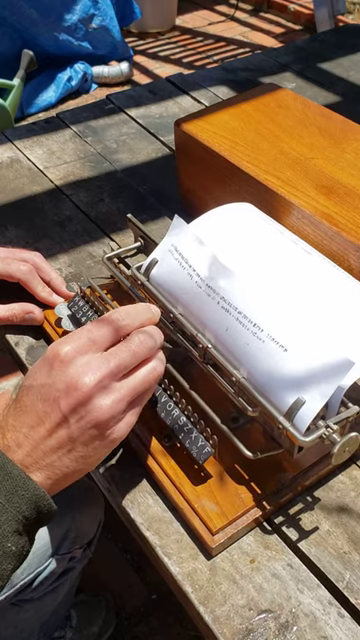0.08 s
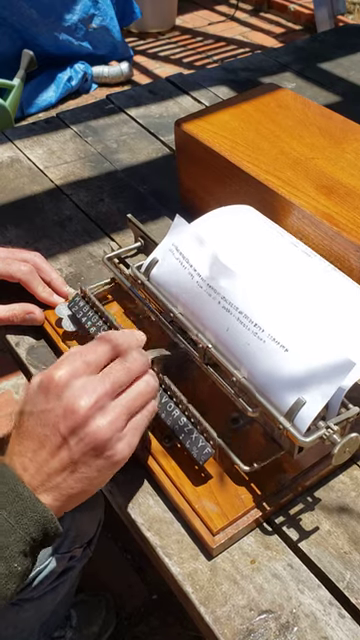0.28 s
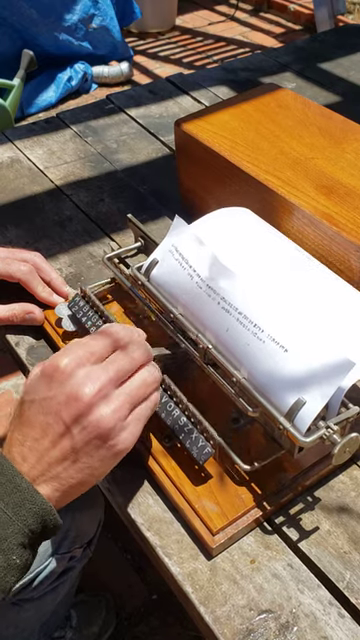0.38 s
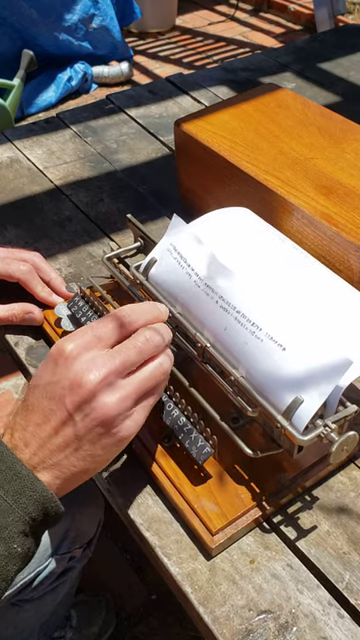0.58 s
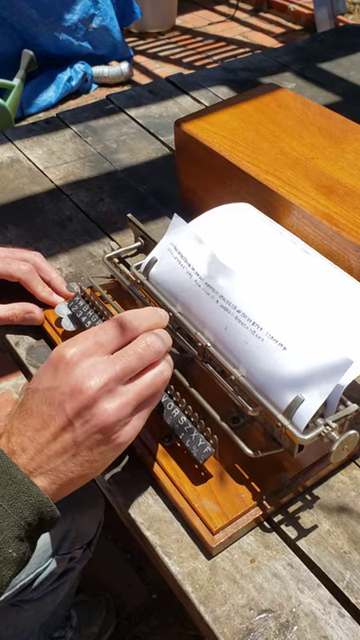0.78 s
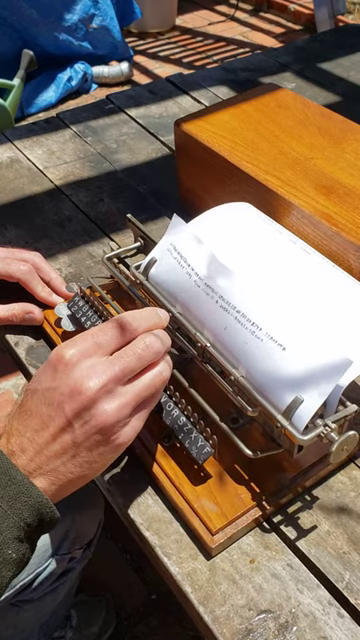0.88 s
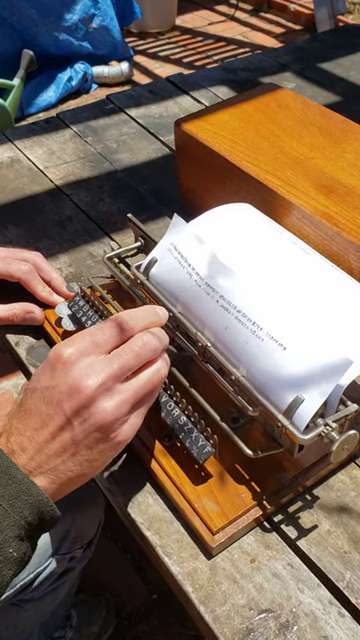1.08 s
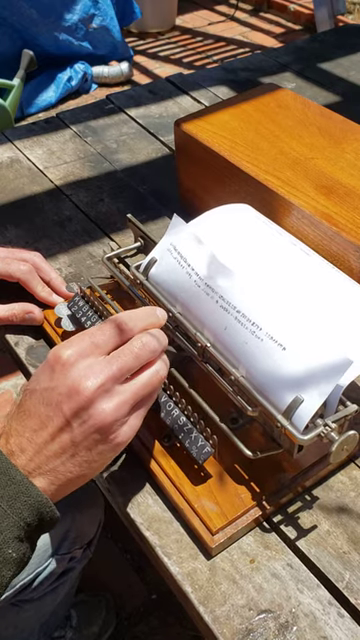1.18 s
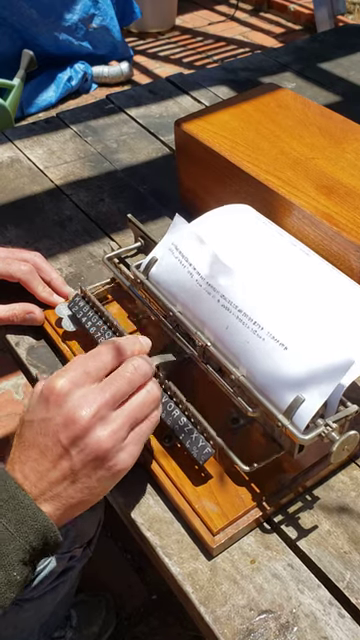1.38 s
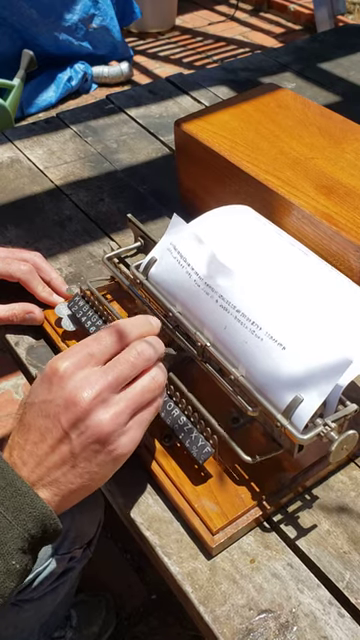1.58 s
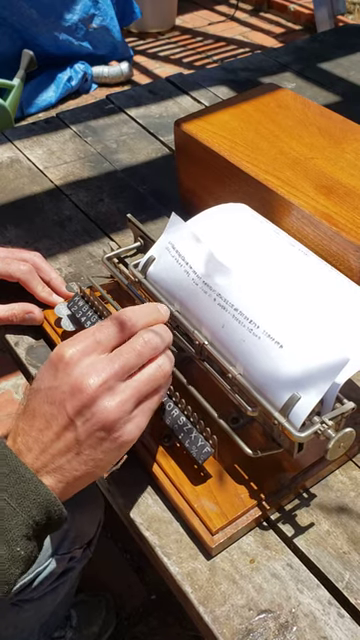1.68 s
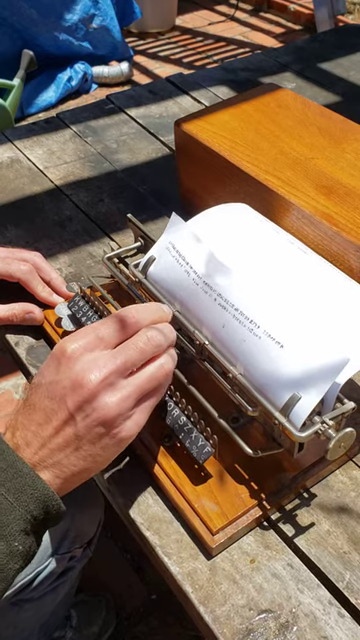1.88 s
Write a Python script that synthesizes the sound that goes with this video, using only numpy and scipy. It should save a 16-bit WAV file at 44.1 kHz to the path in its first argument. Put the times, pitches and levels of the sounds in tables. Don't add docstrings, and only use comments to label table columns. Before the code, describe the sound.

An old index typewriter prints two letters outdoors with metallic clacks and sharp, ringing snaps.

```python
import sys
import numpy as np
from scipy import signal
from scipy.fft import rfft, irfft
from scipy.io import wavfile
from scipy.ndimage import uniform_filter1d

SR = 44100
rng = np.random.default_rng(int(sys.argv[2]) if len(sys.argv) > 2 else 0)


def volts_from_decibels(level):
    exponent = np.asarray(level, float) / 20
    return 10 ** exponent


def generate_wav(sig):
    pcm = np.round(np.clip(np.atleast_2d(sig).T, -1, 1) * 32767).astype(np.int16)
    wavfile.write(sys.argv[1], SR, pcm)


N = 83790

# pitch_hz, level_db (per Hz)
TRAFFIC = [(12, -62.5), (20, -37), (42, -12.5), (65, -3.5), (167, -13.5), (206, -18), (394, -25),
           (1200, -40.5), (1560, -79.5), (2640, -120)]
HISS = [(710, -31), (1200, -2.5), (3590, -9), (4050, -14), (6020, -8.5), (8450, -22), (14900, -16.5),
        (16500, -30)]
TRAFFIC_DB, HISS_DB = -49.5, -74.5
# pitch_hz, likeness (0-1)
AIR_SAME = [(60, 0.9), (240, 0.9), (950, 0.31), (3770, 0.16), (15000, 0.03)]
# pitch_hz, left_minus_right_db
AIR_PAN = [(60, 2.5), (240, 3.5), (950, 2.7), (3770, 3.9), (15000, 4.5)]
DRONE_HZ, DRONE_WIDTH_HZ, DRONE_DB = 62, 9, -51

# start_s, length_s, level_db
SLIDES = [
    (0.127, 0.25, -69.5),
    (1.258, 0.094, -65),
]
# pitch_hz, level_db
RUB = [(600, 12.5), (2500, 4), (6500, -7), (9000, -8), (15000, -8), (16300, -11)]
# start_s, peak_db, links_db, chatter_s
TICKS = [
    (0.0976, -47.5, -21, 0.0019),
    (0.779, -49.5, -40, 0.0015),
    (1.26, -44.5, -13.5, 0.00097),
    (1.716, -54, -15, 0.0017),
]
# pitch_hz, level_db
POINTER = [(1500, 4), (3000, 6.5), (5000, -2), (6400, 13.5), (8000, -2.5), (10000, 0)]

# start_s, peak_db, links_db, wood_db, chatter_s
CONTACTS = [
    (0.2179, -27, -18.5, -18, 0.0046),
    (0.2282, -39, -14, -7, 0.0014),
    (0.2371, -20, -6.5, -15, 0.0031),
    (0.2717, -20, -8.5, -11.5, 0.0029),
    (0.2767, -33.5, -0.5, -5, 0.0021),
    (0.2854, -38.5, -15, -8, 0.0017),
    (0.4816, -35, -25.5, -25.5, 0.0018),
            (1.3049, -53.5, -15, -4, 0.0073), (1.321, -53.5, -32, -21, 0.003),
          (1.3541, -49, -42, 5.5, 0.0038), (1.363, -27.5, -31, -10, 0.0035),
          (1.3647, -21, -6, -17.5, 0.0037), (1.4004, -55.5, -1, -17, 0.0018),
          (1.4063, -25, -12, -14, 0.0037), (1.4114, -42, 7.5, -1, 0.0023), (1.416, -38.5, -17, 0, 0.0035),
          (1.667, -48.5, -14, -14.5, 0.003), (1.8924, -62.5, -26.5, -4, 0.0027)]
# start_s, peak_db, links_db, wood_db, chatter_s
STRIKES = [
    (0.2693, -19, -27, -13.5, 0.0004),
    (1.404, -18.5, -24, -19.5, 0.0004),
]
# start_s, peak_db, links_db, wood_db, chatter_s
LIFTS = [(0.4061, -37.5, -7.5, -2.5, 0.0037), (0.4122, -31, -12, -14, 0.001),
         (0.4138, -33.5, -23.5, -18.5, 0.0014), (0.4201, -29.5, -24.5, -9, 0.0016),
         (0.4235, -43.5, -4.5, -10, 0.002), (0.4273, -40, -2, -3.5, 0.003),
         (1.5334, -43, -3.5, -7.5, 0.0034), (1.5396, -33, -21, -10.5, 0.002),
         (1.5454, -46, -30, -19, 0.0025), (1.5543, -39.5, -3.5, -11, 0.0023),
         (1.5543, -40, -26, -10, 0.0043), (1.575, -44.5, -11, -4, 0.003)]
# start_s, peak_db, links_db, rebound_s, rebound_db
SNAPS = [
    (0.4596, -11, -1.5, .0014, 3),
    (1.5973, -13, -0.5, .0013, 0.9),
]
# start_s, peak_db, pitch_hz
THUMPS = [(0.269, -32.5, 187), (0.278, -25, 108), (0.285, -36, 580), (.295, -26.5, 315),
          (0.311, -25.5, 600), (0.32, -32, 504), (1.407, -30.5, 207), (1.412, -28, 100),
          (1.427, -30.5, 150), (1.418, -34, 275), (1.306, -36, 306), (1.446, -29, 610), (1.556, -32, 670)]
# start_s, pitch_hz, level_db, t60_s
SINES = [(0, 3520, -101.5, 2.5), (.46, 5994, -59.5, 1.19), (.46, 6070, -53.5, 0.64), (.46, 5840, -64, 1.1),
         (.46, 3488, -77, 2.5), (1.41, 3490, -65.5, 8.2), (1.598, 5965, -76, 0.58),
         (1.598, 6000, -64.5, 0.88), (.462, 2638, -45, 0.15), (.462, 2756, -41.5, .17),
         (.462, 4194, -50.5, .17), (1.6, 2920, -38.5, 0.13), (1.6, 2110, -51.5, .24),
         (1.6, 4974, -49.5, 0.12), (.461, 6010, -40, .2), (.462, 7400, -50.5, .12), (.462, 4064, -49.5, .11),
         (1.6, 6848, -47, 0.15), (1.6, 2762, -52, 0.14)]

# pitch_hz, level_db
FRAME = [(1500, -28.5), (2100, -10.5), (2800, 3), (3400, -4), (4200, -7), (5300, -8.5), (7000, -9.5),
         (9500, -23.5)]
PLATEN = [(700, -10), (900, -2), (1890, -6), (3120, 3.5), (3760, -8), (4700, -8.5), (5700, -10),
          (9000, -23.5)]
LINKS = [(7500, -13.5), (9500, -13), (11500, 2), (13500, -0.5), (15750, 1), (16400, -9)]
WOOD = [(200, -8), (320, -9), (650, -3.5), (1100, 0.5), (1700, -4.5), (2200, -8)]
FRAME_T60_S, LINKS_T60_S, WOOD_T60_S = 0.008, 0.0089, 0.087
# pitch_hz, level_db, t60_s
WOOD_MODES = [(215, -5.5, 0.095), (315, -6, 0.083), (400, -10, .05), (504, -5.5, .06), (663, -5, .06),
              (830, -3, .04), (994, -4.5, 0.023), (1092, -4.5, 0.062), (1257, -3.5, .05), (1500, -8, 0.06),
              (1738, -4, .06), (2013, -5.5, .04), (1990, -8, .04)]
PAWL = [(1200, -31, .012), (1840, -16.5, 0.008), (2480, -6.5, 0.006), (2680, -3.5, 0.006), (2980, 0, 0.006),
        (3166, -7.5, .006), (3460, -14, 0.0087), (3976, 1.5, .011), (4200, -1.5, 0.0095),
        (4890, -6.5, 0.023), (6180, -8.5, 0.0078), (7630, 2, .007), (8700, -17, 0.0048)]
REBOUND = [(2060, -18.5, .008), (2583, -8, .01), (2777, 0.5, 0.0092), (3060, -0.5, 0.011)]
SCATTER_DB, PAWL_SCATTER_DB = 1.5, -3
PAWL_LOW_HZ = 1307

# pitch_hz, level_db
SHIVER = [(180, -45), (300, -5), (2400, -11), (2700, -4.5), (5190, -10.5), (6030, -13), (8160, -15.5),
          (15800, -14), (16200, -36)]
# pitch_hz, t60_s
SHIVER_T60 = [(400, 0.22), (1500, 0.27), (3000, .2), (6000, 0.17), (15000, 0.13)]
SHIVER_SAME = 0.43
CONTACT_SHIVER_DB, LIFT_SHIVER_DB, SNAP_SHIVER_DB, REBOUND_SHIVER_DB = -24.5, -20, -30, -22

PAN_DB, LAG_S, LINKS_LAG_S = 5.5, 0.00005, 0.0002


def evened(x):
    return x / np.sqrt(np.mean(x ** 2) + 1e-20)


def read(points, hz):
    f, value = np.transpose(points)
    return np.interp(np.log(hz + 1), np.log(f + 1), value)


def add(mix, s, sound):
    part = mix[:, round(s * SR):][:, :sound.shape[1]]
    part += sound[:, :part.shape[1]]


def sides(db):
    return volts_from_decibels(np.array([[db], [-db]]) / 2)


def peak_scale(wave):
    return np.sqrt(uniform_filter1d(wave ** 2, size=60).max() * 2)


def wash(shape, db):
    frames = N // 512 + 5
    hz = np.fft.rfftfreq(2048, 1 / SR)[:, None]
    a, b, c, d, patches = rng.standard_normal((frames, 1025, 5)).T
    patches = uniform_filter1d(patches, size=14, axis=0)
    patches = evened(uniform_filter1d(patches, size=8, axis=1))
    same = read(AIR_SAME, hz)
    pan = volts_from_decibels(read(AIR_PAN, hz) / 2)
    left = a + 1j * b
    right = same * left + np.sqrt(1 - same ** 2) * (c + 1j * d)
    z = np.array([left * pan, right / pan]) * volts_from_decibels(read(shape, hz) + 0.6 * patches)
    x = signal.istft(z, nperseg=2048, noverlap=1536)[1][:, :N]
    return volts_from_decibels(db) * x / np.sqrt(np.mean(x.mean(0) ** 2))


def air():
    hz = np.fft.rfftfreq(N, 1 / SR)
    resonance = 1 / (1 + ((hz - DRONE_HZ) / DRONE_WIDTH_HZ) ** 2)
    drone = evened(irfft(rfft(rng.standard_normal(N)) * resonance, N))
    return wash(TRAFFIC, TRAFFIC_DB) + wash(HISS, HISS_DB) + volts_from_decibels(DRONE_DB) * sides(1.9) * drone


def slides():
    t = np.arange(N) / SR
    level = 0
    for s, length_s, db in SLIDES:
        fade = np.minimum(t - s, s + length_s - t) / 0.0056
        level = level + volts_from_decibels(db) * np.clip(fade, 0, 1)
    grain = volts_from_decibels(2.6 * evened(uniform_filter1d(rng.standard_normal(N), size=150)))
    return level * grain * wash(RUB, 0)


def sines():
    mix = np.zeros((2, N))
    t = np.arange(N) / SR
    for s, hz, db, t60 in SINES:
        phase = 2 * np.pi * (hz * t + rng.random() + np.array([[0], [0.12]]))
        fade_in = np.minimum(t / 0.01, 1)
        add(mix, s, volts_from_decibels(db - 60 * t / t60) * sides(PAN_DB) * np.sin(phase) * fade_in)
    return mix


def thump(db, hz):
    turns = np.arange(2500) / SR * hz
    envelope = np.exp(-turns / 1.4) * np.minimum(turns / 0.94, 1)
    return volts_from_decibels(db) * sides(3.5) * np.sin(2 * np.pi * turns) * envelope


def ring(modes, lag_s, scatter_db, spread=2, rise_turns=2):
    hz, db, t60 = np.array(modes).T[:, :, None]
    level, detune, side_turn, start_turn = rng.standard_normal((4, len(modes), 1))
    t = np.arange(1800) / SR - np.array([0, lag_s])[:, None, None]
    phase = np.array([0 * side_turn, 0.87 * side_turn]) + spread * start_turn
    tone = np.sin(2 * np.pi * hz * (1 + 0.008 * detune) * t + phase)
    decay = volts_from_decibels(db + scatter_db * level - 60 * t / t60)
    rise = np.clip(t * hz / rise_turns, 0, 1) ** 2
    wave = (decay * tone * rise).sum(1)
    return wave / peak_scale(wave[0])


def crowd(shape, t60, count):
    lo, hi = shape[0][0], shape[-1][0]
    place = (np.arange(count) + rng.random(count)) / count
    hz = lo + (hi - lo) * place ** 1.2754
    return np.array([hz, read(shape, hz), t60 + 0 * hz]).T


def shaped(x, shape):
    z, hz = rfft(x, 2048), np.fft.rfftfreq(2048, 1 / SR)
    broad = uniform_filter1d(abs(z) ** 2, size=round(600 * 2048 / SR), axis=-1)
    flat = z / np.sqrt(broad + 1e-4 * broad.max())
    out = irfft(flat * volts_from_decibels(read(shape, hz)), 2048)[..., :x.shape[-1]]
    return out / peak_scale(np.atleast_2d(out)[0])


def frame(shape):
    outline = [(shape[0][0] / 2, -60)] + shape + [(shape[-1][0] + 2000, -60)]
    return shaped(ring(crowd(shape, FRAME_T60_S, count=70), LAG_S, SCATTER_DB), outline)


def links(db):
    modes = crowd(LINKS, LINKS_T60_S, count=60)
    outline = [(5000, -61)] + LINKS + [(17300, -50)]
    return volts_from_decibels(db) * sides(2.5) * shaped(ring(modes, LINKS_LAG_S, SCATTER_DB), outline)


def wood(db):
    clear = ring(WOOD_MODES, LAG_S, SCATTER_DB)
    crowded = ring(crowd(WOOD, WOOD_T60_S, count=36), LAG_S, SCATTER_DB)
    return volts_from_decibels(db) * (clear + 0.4 * crowded)


def shiver(db, stretch=1, low_hz=100, top_db=0):
    hz, t = np.fft.rfftfreq(256, 1 / SR)[:, None], np.arange(240) * 64 / SR
    a, b, c, d = rng.standard_normal((4, 129, 240))
    left = a + 1j * b
    right = SHIVER_SAME * left + np.sqrt(1 - SHIVER_SAME ** 2) * (c + 1j * d)
    low_cut = hz ** 2 / (hz ** 2 + low_hz ** 2)
    dulling_db = top_db * hz ** 4 / (hz ** 4 + 5500 ** 4)
    decay_db = -60 * t / stretch / read(SHIVER_T60, hz)
    z = np.array([left, right]) * low_cut * volts_from_decibels(read(SHIVER, hz) + dulling_db + decay_db)
    x = signal.istft(z, nperseg=256, noverlap=192)[1]
    x = x * np.minimum(np.arange(x.shape[1]) / SR / 0.0036, 1)
    return volts_from_decibels(db) * x / np.sqrt(np.mean(x[:, :900] ** 2))


def chatter(length_s):
    t = np.arange(900) / SR
    chance, force = rng.random((2, 900))
    taps = (chance < 5000 / SR) * (2 * force - 1)
    drive = taps * np.exp(-t / max(length_s, 0.0002)) * np.minimum(t / 0.0003, 1)
    return shaped(drive + (t == 0) * 0.5, [(1, 0), (SR, 0)])


def struck(drive, body, db, after):
    out = after + 0
    add(out, 0, signal.fftconvolve(body, drive[None] / np.linalg.norm(drive), axes=1))
    return volts_from_decibels(db) * sides(PAN_DB) * out


def contacts(mix, events, shape, **shiver_settings):
    for s, db, links_db, wood_db, length_s in events:
        body = frame(shape) + links(links_db + 7.5) + wood(wood_db + 3.5)
        add(mix, s, struck(chatter(length_s), body, db, shiver(**shiver_settings)))


def ticks(mix):
    for s, db, links_db, length_s in TICKS:
        body = frame(POINTER) + links(links_db + 11.5)
        add(mix, s, struck(chatter(length_s), body, db, shiver(CONTACT_SHIVER_DB)))


def snaps(mix):
    blow = np.ones(1)
    pawl = ring(PAWL, LAG_S, PAWL_SCATTER_DB, spread=0.3, rise_turns=0.99)
    blunt = ring(REBOUND, LAG_S, PAWL_SCATTER_DB, spread=0.3, rise_turns=1.9)
    for s, db, links_db, rebound_s, rebound_db in SNAPS:
        quick = shiver(REBOUND_SHIVER_DB, 0.15, PAWL_LOW_HZ)
        add(mix, s + rebound_s, struck(blow, volts_from_decibels(rebound_db) * blunt, db, quick))
        add(mix, s - 0.0003, struck(chatter(0.001), links(links_db), db, np.zeros((2, 2700))))
        add(mix, s, struck(blow, pawl, db, shiver(SNAP_SHIVER_DB, 1.4, PAWL_LOW_HZ / 2)))


def typewriter():
    mix = sines()
    for s, db, hz in THUMPS:
        add(mix, s, thump(db, hz))
    ticks(mix)
    contacts(mix, CONTACTS, FRAME, db=CONTACT_SHIVER_DB)
    contacts(mix, LIFTS, FRAME, db=LIFT_SHIVER_DB, stretch=0.8, top_db=-2)
    contacts(mix, STRIKES, PLATEN, db=CONTACT_SHIVER_DB)
    snaps(mix)
    return mix


def scene():
    return air() + slides() + typewriter()


def band_limit(x):
    return signal.sosfilt(signal.butter(12, 17150, fs=SR, output="sos"), x)


def record(dry):
    band_edge = signal.cheby2(8, 30, 16950, fs=SR, output="sos")
    low_cut = signal.butter(2, 38, "high", fs=SR, output="sos")
    heard = signal.sosfilt(low_cut, signal.sosfilt(band_edge, dry))
    limit = 1.4
    return band_limit(limit * np.tanh(heard / limit))


dry = scene()
out = record(dry)
generate_wav(out)
```